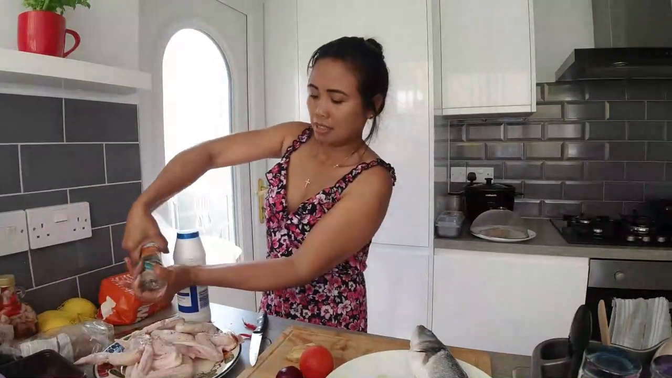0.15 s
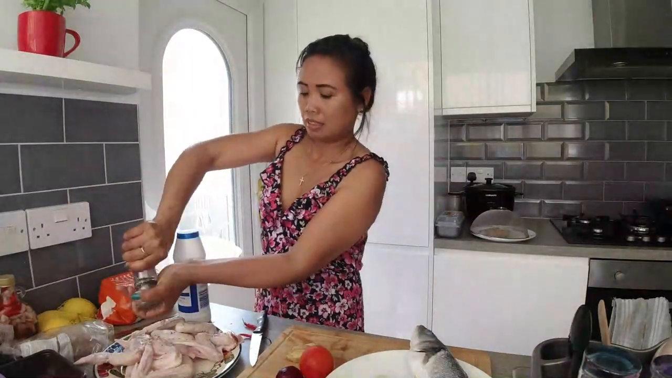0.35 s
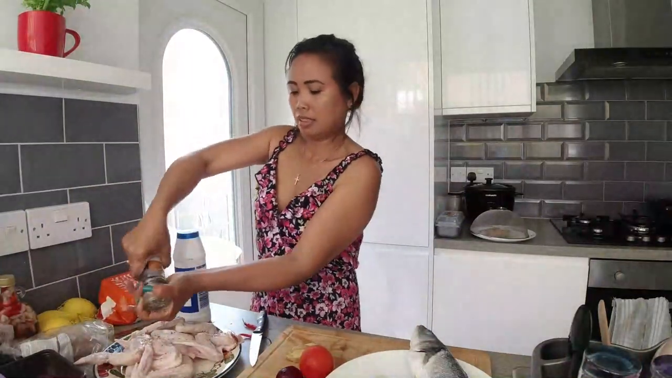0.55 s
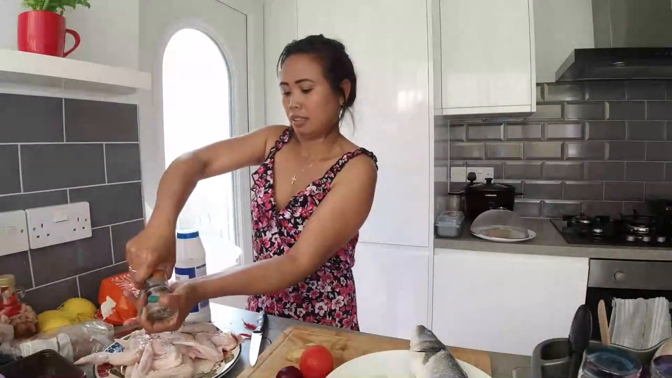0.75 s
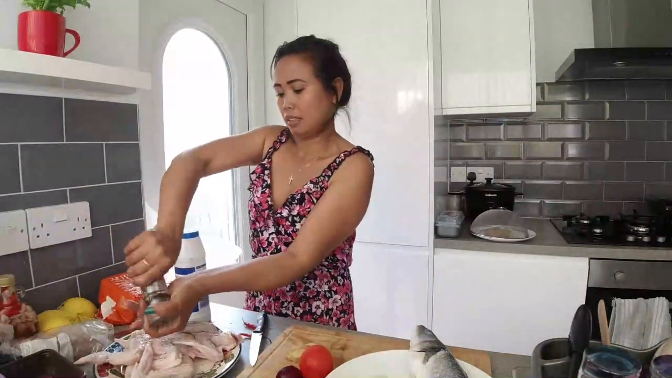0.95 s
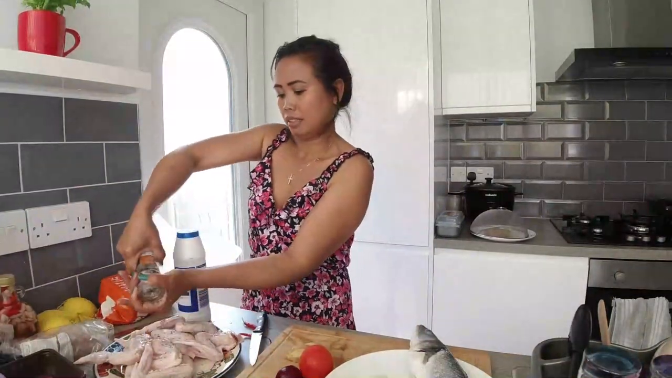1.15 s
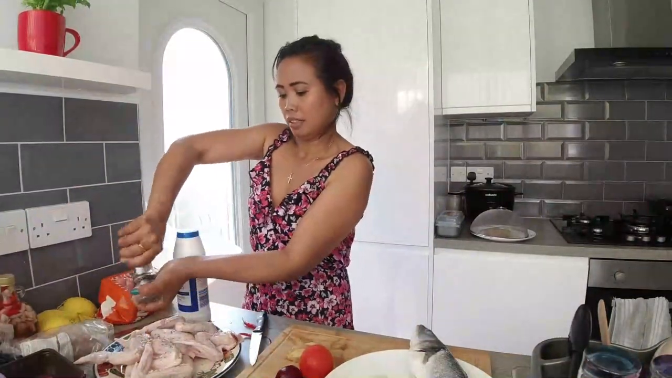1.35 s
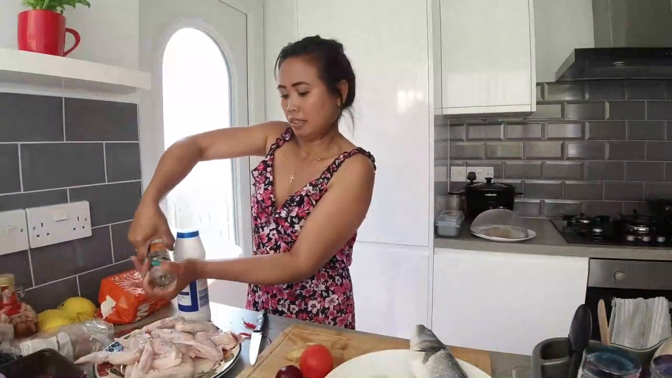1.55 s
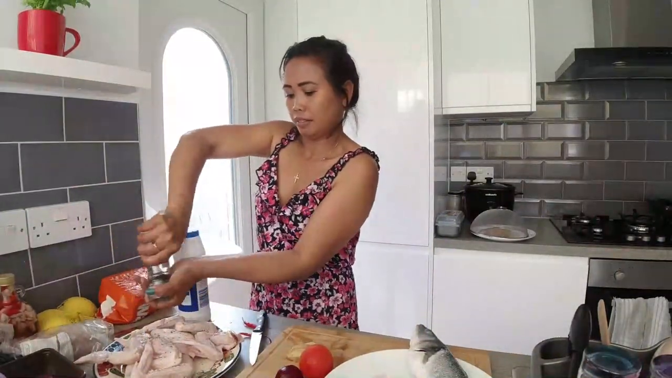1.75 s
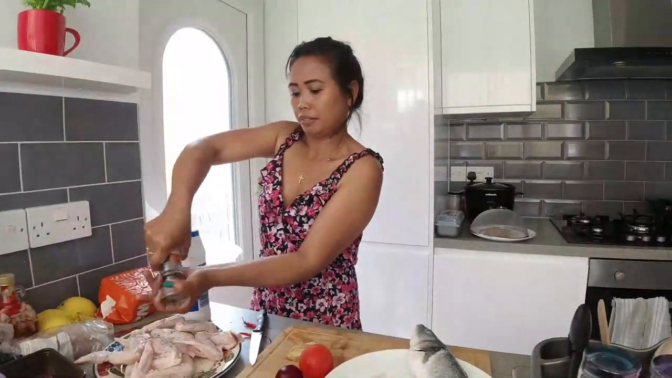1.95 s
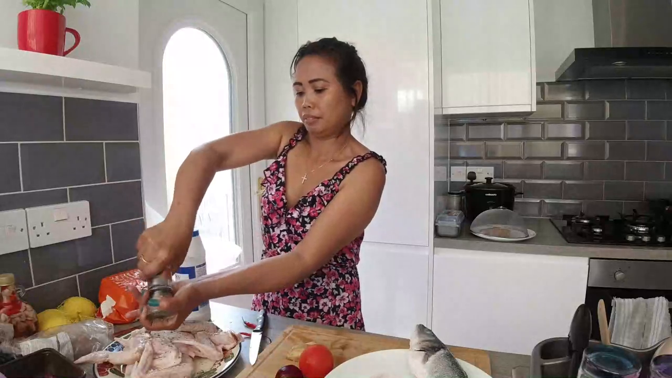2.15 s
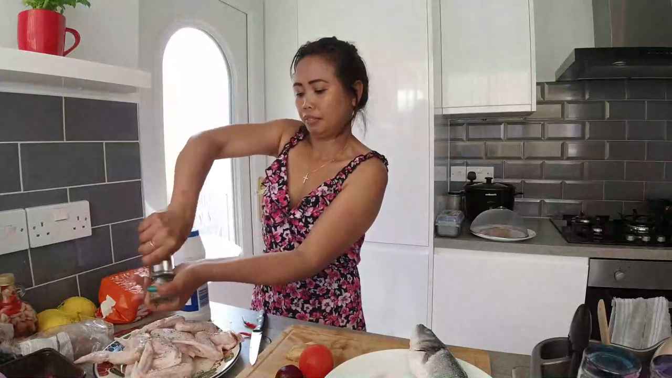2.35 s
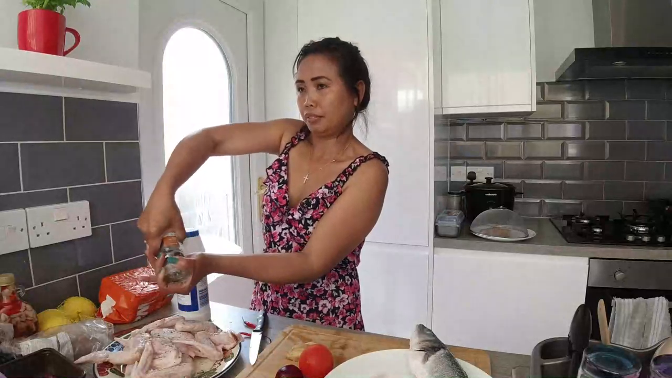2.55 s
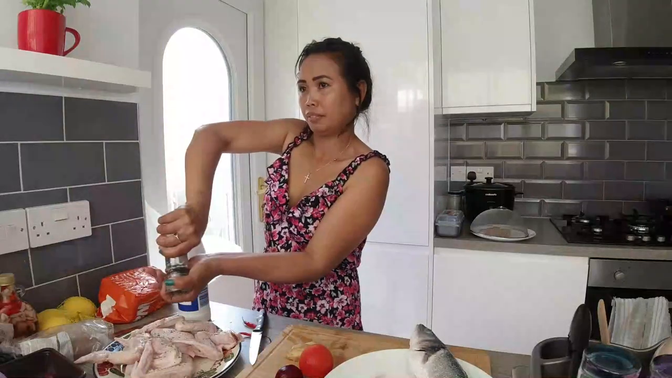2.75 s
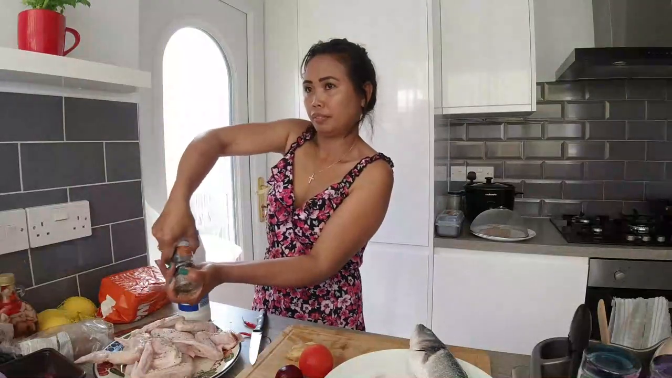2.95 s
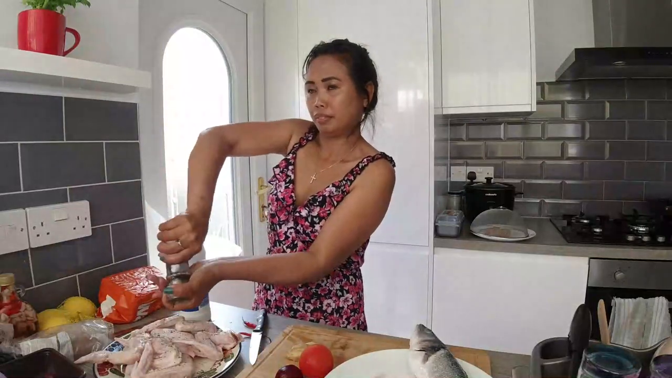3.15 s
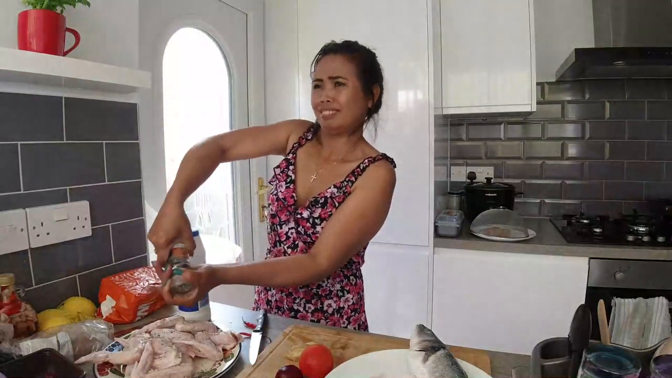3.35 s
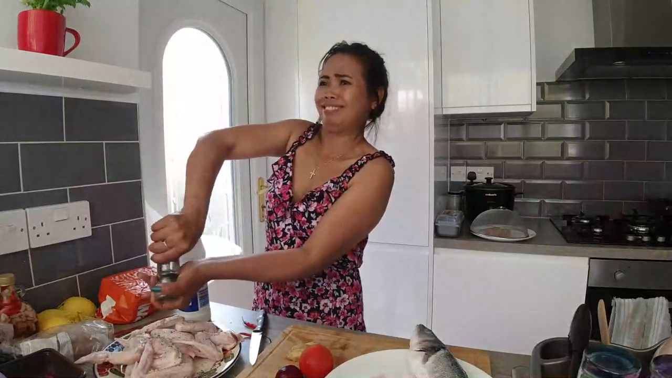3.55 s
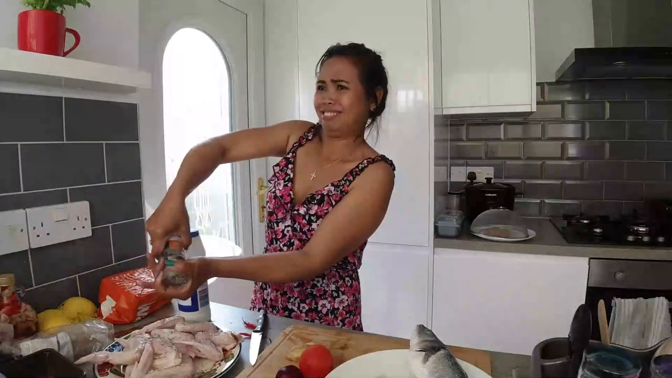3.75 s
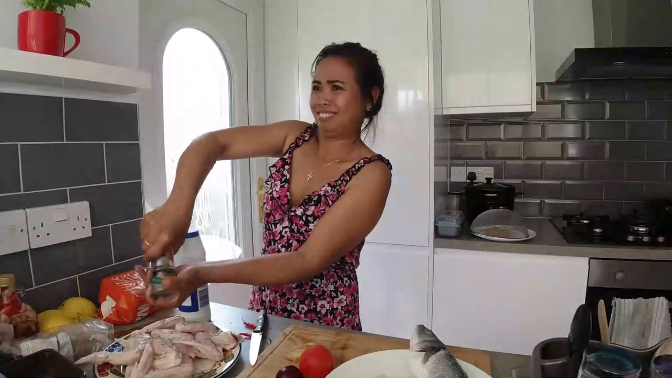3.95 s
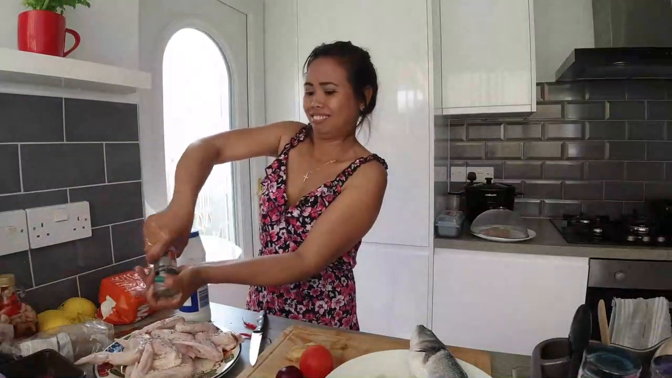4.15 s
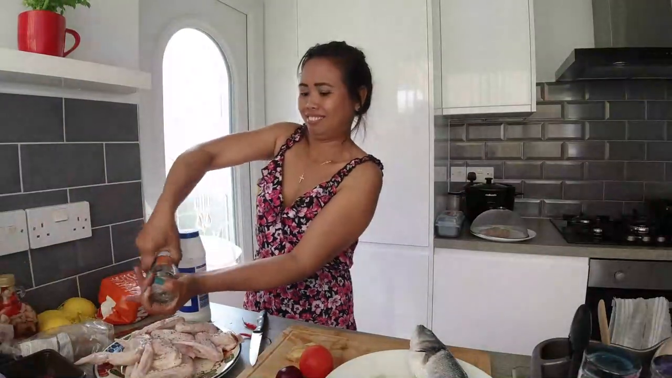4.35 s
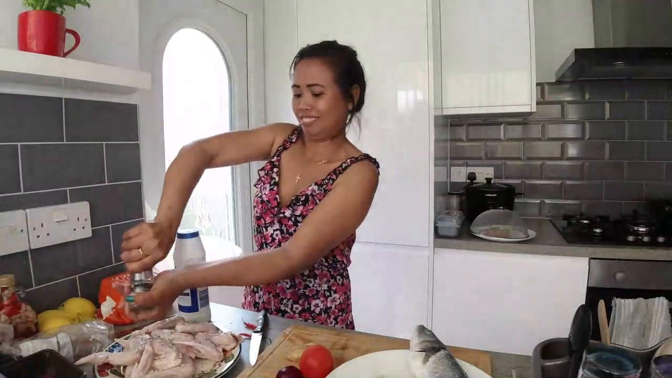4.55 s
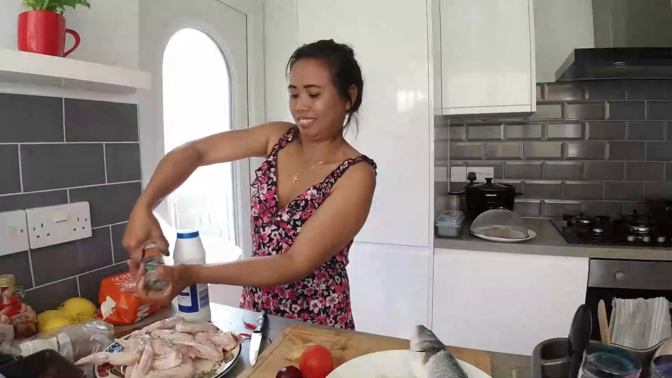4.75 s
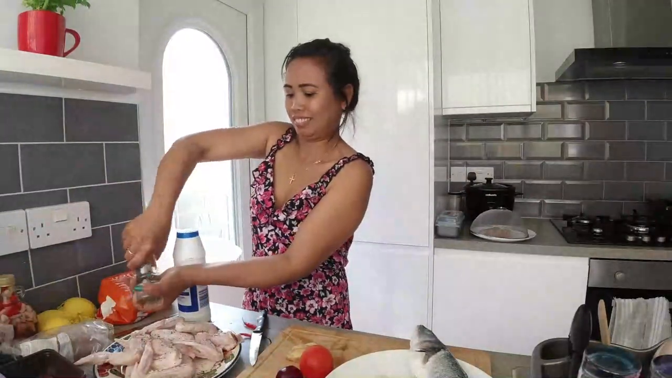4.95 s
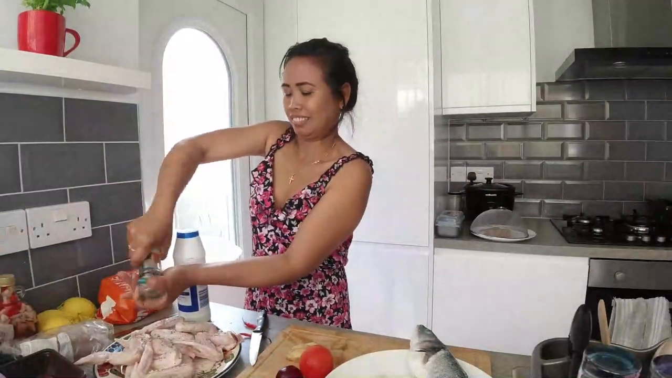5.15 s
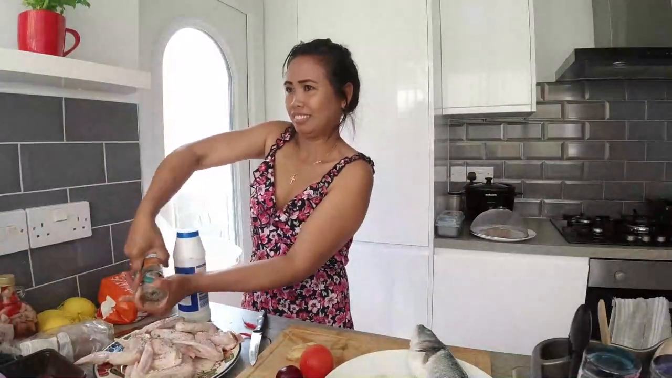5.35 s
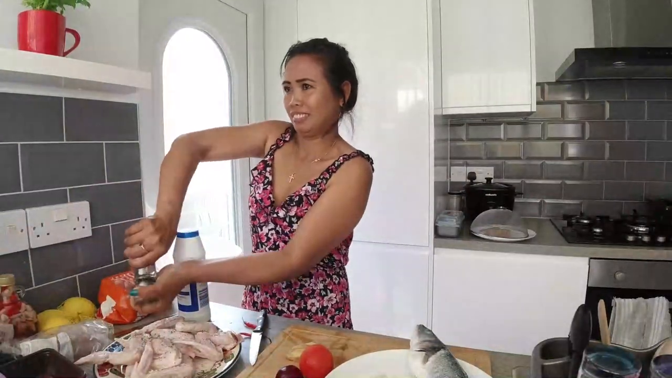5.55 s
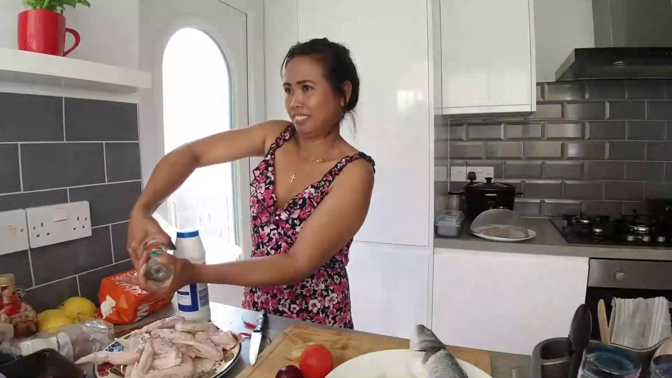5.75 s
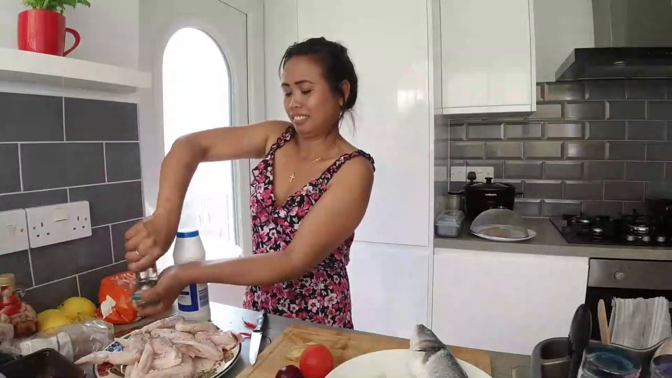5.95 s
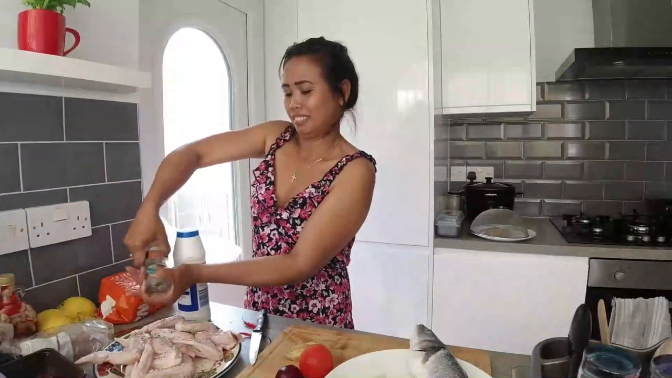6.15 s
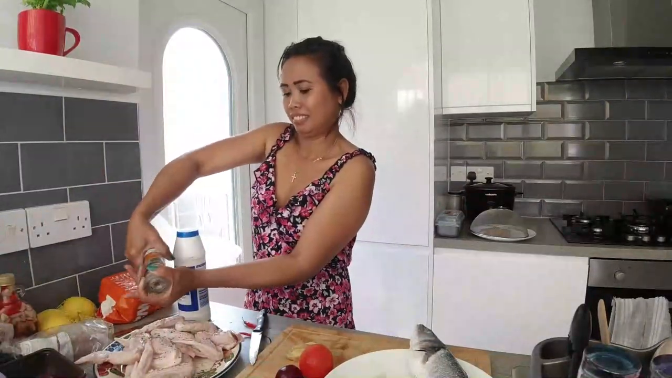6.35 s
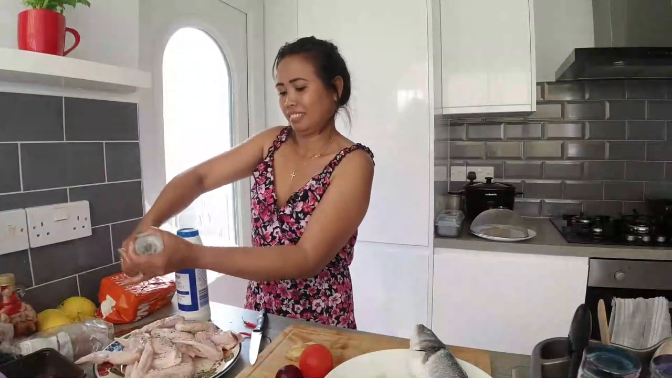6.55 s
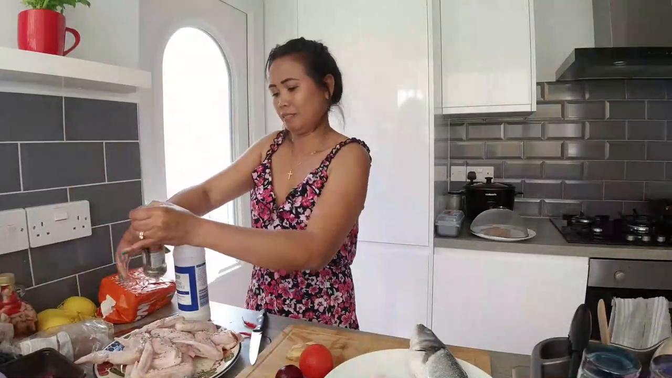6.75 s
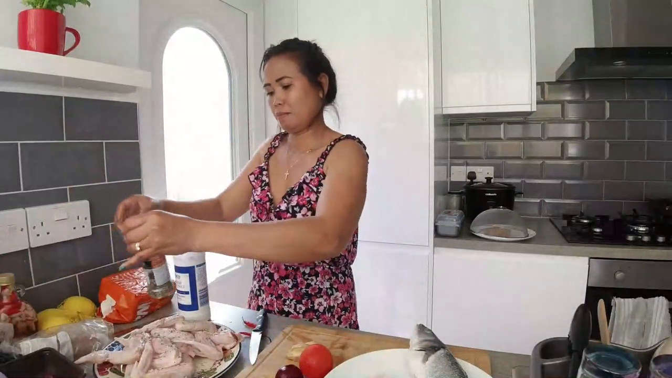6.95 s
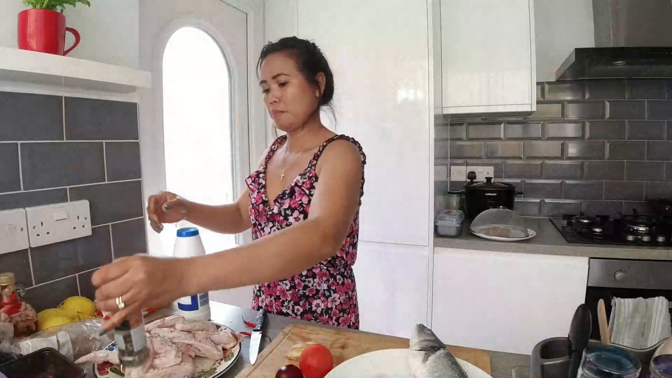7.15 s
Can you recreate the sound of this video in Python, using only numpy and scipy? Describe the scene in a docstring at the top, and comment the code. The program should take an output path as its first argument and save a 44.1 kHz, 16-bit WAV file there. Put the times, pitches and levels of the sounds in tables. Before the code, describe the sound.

A hand-twisted spice grinder crunches and clicks about twice a second in a small tiled kitchen, over a faint appliance hum.

```python
"""A hand-twisted spice grinder crushes seasoning in a small tiled kitchen, over an appliance's hum.
From the start, about twice a second, a hard twist fractures grains: each impulse rings the burr, and
fine grit crunches in between. On each lighter turn back the cap ticks brightly; now and then the
teeth chirp by stick-slip friction and the grinder knocks in the hands. A soft bump comes at 5.1 s,
the last twist at 6.3 s, and near 6.9 s a faint squeak as the grinder is turned upright."""
import sys
import numpy as np
from scipy import signal
from scipy.fft import rfft, irfft
from scipy.io import wavfile
from scipy.ndimage import uniform_filter1d

SR = 44100
rng = np.random.default_rng(int(sys.argv[2]) if len(sys.argv) > 2 else 0)


def wav_record(signal):
    """Record a signal, one row per channel, as 16-bit PCM in the file named by sys.argv[1]."""
    frames = np.transpose(np.atleast_2d(signal))
    bounded = np.clip(frames, -1, 1)
    # unit amplitude maps onto the largest positive 16-bit level
    quanta = np.round(bounded * 32767).astype(np.int16)
    wavfile.write(sys.argv[1], SR, quanta)


N = 317520


def amp(db):
    """Amplitude ratio of a level in decibels."""
    return 10 ** (np.asarray(db) / 20)


def unit_rms(x):
    """Normalisation to unit mean power."""
    return x / np.sqrt(np.mean(x ** 2) + 1e-20)


def curve_at(points, hz):
    """Interpolation on a logarithmic frequency axis."""
    f, value = np.transpose(points)
    return np.interp(np.log(hz + 1), np.log(f + 1), value)


def add(mix, start_s, sound):
    """Superposition: a sound joins the mix at start_s, or at zero if that is negative."""
    part = mix[max(round(start_s * SR), 0):][:len(sound)]
    part += sound[:len(part)]


def band_noise(centre_hz, width_hz):
    """Band-pass filtering confines white noise to one bell-shaped band."""
    hz = np.fft.rfftfreq(N, 1 / SR)
    spectrum = rfft(rng.standard_normal(N)) / (1 + (2 * (hz - centre_hz) / width_hz) ** 4)
    return unit_rms(irfft(spectrum, N))


# Spectrum of the room air: frequency_hz, relative_density_db
AIR_SPECTRUM = [(25, -4), (50, -14.5), (75, -10), (140, -7.5), (240, -1.5), (320, -13.5), (520, -23.5),
                (1500, -35), (6000, -48.5), (15000, -70.5)]
# Partials of the appliance: pitch_hz, level_db
HUM_PARTIALS = [(49, -54.5), (100, -61.5), (134, -60), (233, -51.5), (349, -62.5)]
def air_and_hum(air_db=-54, side_db=-21, waver_hz=9):
    """Beating: over low air noise, each hum partial wavers against a narrow noise band at its pitch."""
    hz, t = np.fft.rfftfreq(N, 1 / SR), np.arange(N) / SR
    air = rfft(rng.standard_normal((2, N))) * amp(curve_at(AIR_SPECTRUM, hz))
    mid, side = amp(air_db) * unit_rms(irfft(air, N))
    for pitch_hz, level_db in HUM_PARTIALS:
        tone = np.sin(2 * np.pi * (pitch_hz * t + rng.random()))
        mid = mid + amp(level_db) * unit_rms(tone + band_noise(pitch_hz, waver_hz))
    return np.array([mid + amp(side_db) * side, mid - amp(side_db) * side])


# Reverberation time of the kitchen: frequency_hz, t60_s
REVERB_TIMES = [(250, 0.18), (700, 0.33), (1700, 0.33), (2750, 0.28), (4500, 0.27), (8000, 0.21),
                (15000, 0.16)]
# Likeness of the left and right reverberation: frequency_hz, correlation
REVERB_CORRELATION = [(200, 0.98), (600, 0.93), (1300, 0.67), (2600, 0.27), (4500, 0), (15000, 0.27)]
def room_tail(first_s=0.0015, build_s=0.00013, echoes_per_s=5000, size=24000):
    """Reverberation: sparse reflections off tiles and cupboards decay at each band's own rate."""
    t = np.arange(size) / SR
    echoes = rng.choice([-1., 1.], (2, size)) * (rng.random((2, size)) < echoes_per_s / SR)
    echoes *= 1 - np.exp(-np.maximum(t - first_s, 0) / build_s)
    hz, delay_s, bands = signal.stft(echoes, SR, nperseg=256)
    correlation = np.clip(curve_at(REVERB_CORRELATION, hz), -1, 1)[:, None]
    mid, side = bands[0] * np.sqrt(1 + correlation), bands[1] * np.sqrt(1 - correlation)
    decay = amp(-60 * delay_s / curve_at(REVERB_TIMES, hz)[:, None])
    bands = np.array([mid + side, mid - side]) * decay
    spectrum = rfft(signal.istft(bands, SR, nperseg=256)[1])
    # a diffuse field carries about the same energy in every broad band
    power = uniform_filter1d((np.abs(spectrum) ** 2).mean(0), size=200)
    return irfft(spectrum / np.sqrt(power))


def kitchen(x, wet_db=-0.5, direct_db=-2.0, lag_s=.00005, sway_hz=.9, positions=4):
    """Path difference: direct sound arrives first on the left; the echoes shift as the hands move."""
    hz, t = np.fft.rfftfreq(N, 1 / SR), np.arange(N) / SR
    delayed = irfft(rfft(x) * np.exp(-2j * np.pi * hz * lag_s), N)
    out = amp(direct_db) * np.array([x, delayed])
    for k in range(positions):
        # each position fades into the next at constant power
        distance = (sway_hz * positions * t - k + 1) % positions - 1
        fade = np.cos(np.pi / 2 * np.minimum(distance, 1))
        out += amp(wet_db) * signal.oaconvolve((x * fade)[None], room_tail(), axes=1)[:, :N]
    return out


def standing_wave(x, pitch_hz=269, t60_s=0.46, gain_db=3):
    """Resonance: one low mode of the kitchen booms on after each twist."""
    quality = pitch_hz * t60_s / np.log(9)
    b, a = signal.iirpeak(pitch_hz, quality, fs=SR)
    return amp(gain_db) * signal.lfilter(b, a, x)


# Modes of the bumped surface: pitch_hz, level_db, t60_s
BUMP_MODES = [(92, -24, 0.088), (118, -32, 0.36), (165, -34, 0.18), (231, -30.5, 0.13)]
def bump(start_s=5.111, rise_s=0.0021):
    """Free vibration: low modes die away after a soft knock against the counter or floor."""
    out, t = np.zeros(N), np.arange(SR) / SR
    ring = sum(amp(db - 60 * t / t60_s) * np.sin(2 * np.pi * hz * t) for hz, db, t60_s in BUMP_MODES)
    add(out, start_s, -ring * (1 - np.exp(-t / rise_s)))
    return out


# Bands of the squeak: peak_s, half_length_s, centre_hz, width_hz, level_db
SQUEAK_BANDS = [(6.86, .035, 13600, 450, -52.5), (6.905, 0.037, 6430, 270, -52.5),
                (6.88, 0.11, 2800, 5000, -69.5), (6.88, 0.05, 9350, 1100, -65)]
def squeak():
    """Narrow-band noise is heard as pitch: a thin squeak swells and fades as the grinder is righted."""
    t = np.arange(N) / SR
    return sum(amp(db) * np.exp(-((t - peak_s) / half_s) ** 2) * band_noise(hz, width_hz)
               for peak_s, half_s, hz, width_hz, db in SQUEAK_BANDS)


# Knocks as the grinder rocks in the hands: start_s, pitch_hz, energy_db
HAND_KNOCKS = [(.119, 550, 2.5), (.131, 604, -4.5), (.722, 400, -11), (1.174, 560, -3.5), (1.217, 266, -7),
               (1.877, 290, -2), (2.334, 270, -18), (2.522, 293, -5), (3.39, 355, -6.5), (3.878, 560, -7.5),
               (5.279, 420, -7)]
def knocks(decay_cycles=0.8, size=1500):
    """Heavy damping: the hands absorb each knock within a few cycles."""
    out, t = np.zeros(N), np.arange(size) / SR
    for start_s, pitch_hz, energy_db in HAND_KNOCKS:
        thud = np.sin(2 * np.pi * pitch_hz * t) * t * np.exp(-pitch_hz * t / decay_cycles)
        add(out, start_s, amp(energy_db) * thud / np.linalg.norm(thud))
    return out


# Chirps of the teeth: start_s, pitch_hz, energy_db
TOOTH_SLIPS = [(.468, 5500, 1), (1.122, 2060, 0), (1.876, 5240, 7.5), (2.102, 5460, 8), (2.279, 5330, -3.5),
               (2.922, 3440, 5.5), (2.955, 3570, 1.5), (2.979, 3750, 2.5), (3.188, 4200, 1.5),
               (4.292, 3430, 1), (5.321, 3170, 8), (5.574, 5980, 2)]
def slips(swell_s=.0007, jitter=.27, size=600):
    """Stick-slip friction: the teeth catch and release in a brief run of uneven cycles."""
    out, t = np.zeros(N), np.arange(size) / SR
    for start_s, pitch_hz, energy_db in TOOTH_SLIPS:
        uneven_hz = pitch_hz * (1 + jitter * uniform_filter1d(rng.standard_normal(size), size=9))
        chirp = np.sin(2 * np.pi * np.cumsum(uneven_hz) / SR) * t * np.exp(-t / swell_s)
        add(out, start_s, amp(energy_db) * chirp / np.linalg.norm(chirp))
    return out


# Broad spectral envelope of the grinder: frequency_hz, gain_db
GRINDER_COLOUR = [(60, -46.5), (150, -11), (270, -1), (450, -4.5), (800, -3), (1200, 0), (2300, -2.5),
                  (3300, -6.5), (4500, 0.5), (6500, 2), (7600, -5), (9500, -2.5), (12500, -7.5),
                  (16000, -12)]
# Resonances on top of that envelope: pitch_hz, width_hz, relative_db
GRINDER_MODES = [(595, 66, 2), (1419, 38, 7), (2056, 220, 7.5), (2678, 125, 16), (2797, 170, 15),
                 (3080, 280, -10.5), (3260, 270, 6), (3720, 170, 3), (5250, 250, 1), (6300, 870, 1),
                 (8800, 120, -8)]
def grinder_response(tuning=1, borders_hz=(2200, 3800, 7200), size=2048):
    """Impulse response of the grinder in four bands, low to high: body, burr, cap and snap."""
    hz = np.fft.rfftfreq(size, 1 / SR)
    peaks = sum(amp(db) ** 2 / (1 + (2 * (hz - pitch_hz * tuning) / width_hz) ** 2)
                for pitch_hz, width_hz, db in GRINDER_MODES)
    colour = amp(curve_at(GRINDER_COLOUR, hz)) * np.sqrt(1 + peaks)
    lowpasses = [1 / (1 + (hz / border) ** 24) for border in borders_hz]
    band_power = np.abs(np.diff(lowpasses, axis=0, prepend=0, append=1))
    log_gain = np.log(colour * np.sqrt(band_power) + 1e-4)
    # minimum phase: nothing sounds before the impulse
    mirrored = np.concatenate([log_gain, log_gain[:, -2:0:-1]], axis=1)
    return np.fft.ifft(np.exp(np.conj(signal.hilbert(mirrored)))).real


def stroke_envelope(t, length_s, slope_db_per_s, lead_in_s=0.032):
    """Exponential growth and decay: a faint rasp swells for about 30 ms, then the stroke runs and dies."""
    onset_db_per_s, build_db_per_s, release_db_per_s = 1100, 459.5, 651
    rise_db = onset_db_per_s * np.minimum(t + lead_in_s, 0) + build_db_per_s * np.clip(t, -lead_in_s, 0)
    held_db = slope_db_per_s * np.clip(t, 0, length_s)
    release_db = release_db_per_s * np.maximum(t - length_s, 0)
    return amp(rise_db + held_db - release_db)


# Hard twists, from the moment the burr bites: start_s, length_s, level_db, brightness_db
HARD_TWISTS = [(0.108, .042, -23.5, 0), (0.614, 0.12, -28, 0.5), (1.122, 0.053, -25, -5.5),
               (1.58, .083, -24.5, 0), (2.027, 0.054, -30, -2), (2.514, 0.039, -21.5, 3.5),
               (2.981, .043, -22.5, 2.5), (3.371, 0.049, -26, -2), (3.835, 0.065, -21.5, 0),
               (4.281, 0.11, -25, 0.5), (4.787, 0.064, -28, -1.5), (5.28, 0.079, -23.5, 1),
               (5.769, 0.095, -22.5, -1.5), (6.226, 0.026, -23, -0.5), (6.332, 0.012, -22, 4)]
# Light turns back over loose grit: stop_s, length_s, final_level_db
RETURN_TURNS = [(.002, .03, -37), (0.469, 0.12, -36.5), (0.843, 0.012, -43.5), (.95, .04, -34.5),
                (1.431, .075, -38), (1.883, 0.11, -31), (2.28, .006, -37.5), (2.321, .015, -33.5),
                (2.813, 0.094, -34.5), (3.198, 0.03, -33), (3.353, .04, -44.5), (3.66, 0.049, -37),
                (4.116, 0.12, -35), (4.571, 0.064, -41.5), (5.085, 0.034, -39), (5.584, 0.1, -42),
                (5.753, 0.044, -36.5), (6.077, 0.16, -40.5), (6.546, 0.048, -45.5)]
def grit_envelopes(sag_db_per_s=58.5, swell_db_per_s=103.5, lead_s=4000 / SR, size=16000):
    """Incoherent strokes add in power: twists sag as grains give way, turns back swell to their stop."""
    # body, burr, cap, snap
    twist_db, turn_db = np.array([-6, -3, -10, -8]), np.array([-5.5, -4.5, -8.5, -8.5])
    treble = np.array([0, 0, 1, 1])
    strokes = [(start_s, length_s, -sag_db_per_s, db + twist_db + brightness_db * treble)
               for start_s, length_s, db, brightness_db in HARD_TWISTS]
    strokes += [(stop_s - length_s, length_s, swell_db_per_s, db - swell_db_per_s * length_s + turn_db)
                for stop_s, length_s, db in RETURN_TURNS]
    power, t = np.zeros((4, N)), np.arange(size) / SR - lead_s
    for grip_s, length_s, slope, bands_db in strokes:
        before_zero = max(round((lead_s - grip_s) * SR), 0)
        envelope = stroke_envelope(t, length_s, slope)[before_zero:]
        for band, db in zip(power, bands_db):
            add(band, grip_s - lead_s, (amp(db) * envelope) ** 2)
    return np.sqrt(power)


def grit(grains_per_s=380, spread_db=4, crumble_s=0.002, powder=.025, size=700):
    """Shot noise: many tiny fractures of random size excite the grinder, over the rasp of powder."""
    t = np.arange(size) / SR
    strengths = amp(spread_db * np.minimum(rng.exponential(1, N), 3))
    impulses = strengths * (rng.random(N) < grains_per_s / SR)
    bursts = signal.oaconvolve(impulses, np.exp(-t / crumble_s))[:N] + powder
    # the hand supplies energy steadily, however the grains share it
    bursts /= np.sqrt(np.abs(uniform_filter1d(bursts ** 2, size=1100)) + 1e-9)
    force = bursts * rng.standard_normal(N) * grit_envelopes()
    response = grinder_response()
    response /= np.linalg.norm(response, axis=1, keepdims=True)
    return signal.oaconvolve(force, response, axes=1)[:, :N].sum(0)


def strike(mix, at_s, bands_db, give_s=0.0012, snap=0.99, detune=0.01, lead=100, size=700):
    """Impulse excitation: a snap within a noise burst rings the grinder at a slightly random pitch."""
    t = (np.arange(size) - lead) / SR
    crumble_s = np.array([.0036, .0026, .0024, .0014])[:, None]  # by band: the treble stops first
    envelope = np.exp(-np.abs(t) / np.where(t < 0, give_s, crumble_s))
    noise = rng.standard_normal(size)
    force = noise * np.abs(noise) * envelope
    force[:, lead] += snap
    rings = signal.fftconvolve(grinder_response(1 + detune * noise[-1]), force, axes=1)
    rings /= np.linalg.norm(rings, axis=1, keepdims=True)
    add(mix, at_s + t[0], amp(bands_db) @ rings)


# Ticks of the cap: start_s, energy_db, brightness_db
CAP_TICKS = [(.442, -9.5, 4), (.467, -1.5, 3.5), (.945, -2, 2.5), (1.433, -2.5, 2.5), (1.855, -4, 2.5),
             (1.876, 4, 0.5), (2.102, 5, 0), (2.277, -3, 1), (2.334, 3, -1), (2.812, -15, -5.5),
             (3.188, 2, 4), (3.26, -4, 1), (3.336, -9.5, 0), (3.628, -5, -2.5), (4.078, -10, 0),
             (4.586, -13, -3.5), (5.063, -7.5, 3.5), (5.574, 0, 0.5), (5.985, -9, 0), (6.516, -20.5, 3.5),
             (6.55, -18, -7)]
def cap_ticks():
    """Impact: the cap ticks as the hand stops or reverses; brightness tilts the spectrum."""
    out = np.zeros(N)
    share_db, tilt = np.array([-1, -1, 0, -1.5]), np.array([-1, -0.52, 0.31, 0.98])  # by band
    for start_s, energy_db, brightness_db in CAP_TICKS:
        strike(out, start_s, energy_db + share_db + brightness_db * tilt)
    return out


# Coarse grains that break during the twists: start_s, fracture_energy_db, burr_energy_db
GRAIN_CRACKS = [(0.09, -6, -4.5), (.118, 3.5, 6.5), (.128, 5.5, 6.5), (.145, 4, 2), (.158, -9, 11.5),
                (.258, -13, -6), (0.578, -15, -10.5), (.615, 3.5, 3), (.633, -4.5, 6.5), (0.699, 0.5, -0.5),
                (0.722, -24, 6.5), (1.122, -3, 2), (1.174, 1.5, 11.5), (1.216, -2.5, -16),
                (1.594, -3.5, 1.5), (1.641, 3, 4.5), (1.671, 1.5, 3), (2.047, 1, -0.5), (2.506, 2.5, 6.5),
                (2.547, -4.5, 5.5), (2.922, 0.5, 2), (2.979, 3.5, 4.5), (2.99, 0, 13.5), (3.393, -0.5, 2.5),
                (3.812, -3, -7.5), (3.843, 2, 11.5), (3.855, -8.5, 8.5), (3.902, 5, 12), (3.921, 2.5, 10),
                (4.273, -4.5, 1.5), (4.295, -10, -3), (4.312, 8, 10), (4.337, 3.5, 10), (4.373, -3, 8.5),
                (4.793, -3.5, -21), (4.899, -14.5, -10.5), (5.257, -13.5, -8), (5.28, 3.5, 5),
                (5.321, 1, 9), (5.388, -14.5, -1), (5.764, -5.5, 0.5), (5.844, 2.5, 12), (6.195, -6.5, -5),
                (6.212, -9.5, 5), (6.223, -1, 3), (6.328, -1, 9), (6.349, -12, 5.5)]
def cracks(body_db=-3, cap_db=-4, snap_db=0.5, tilt_share=.6):
    """Brittle fracture: each grain snaps and rings the burr; a dull twist gives hollow cracks."""
    out = np.zeros(N)
    bite_s, _, _, brightness_db = np.transpose(HARD_TWISTS)
    for start_s, db, burr_db in GRAIN_CRACKS:
        tilt_db = tilt_share * brightness_db[np.argmin(np.abs(bite_s - start_s))]
        bands_db = (db + body_db - tilt_db, burr_db, db + cap_db + tilt_db, db + snap_db + tilt_db)
        strike(out, start_s, bands_db)
    return out


def scene():
    """Superposition of the grinder, the kitchen's response, the bump and the background."""
    grinder = cap_ticks() + cracks() + slips() + knocks() + grit()
    return kitchen(grinder + squeak()) + standing_wave(grinder) + bump() + air_and_hum()


def record(dry, ceiling=.85, cutoff_hz=15900):
    """Soft saturation rounds the highest peaks; a low-pass filter limits the band."""
    rounded = dry / (1 + (dry / ceiling) ** 4) ** .25
    lowpass = signal.firwin(511, cutoff_hz, window=("kaiser", 9), fs=SR)
    return signal.oaconvolve(rounded, lowpass[None], "same")


dry = scene()
out = record(dry)
wav_record(out)
```